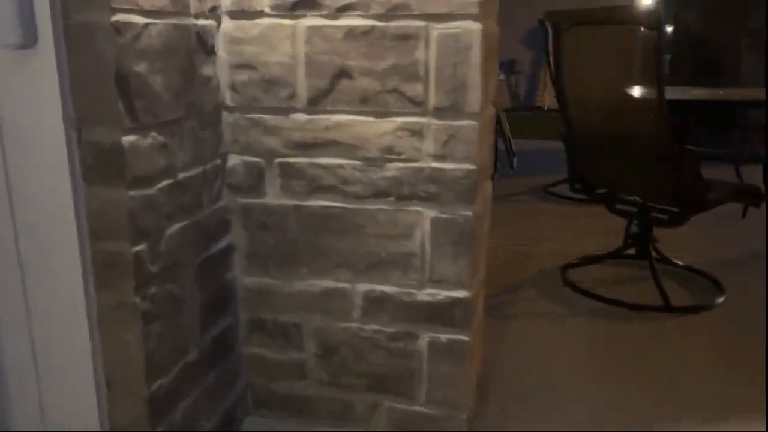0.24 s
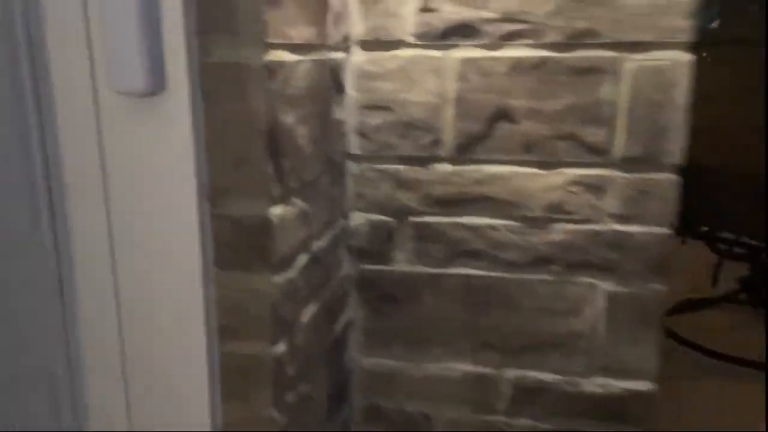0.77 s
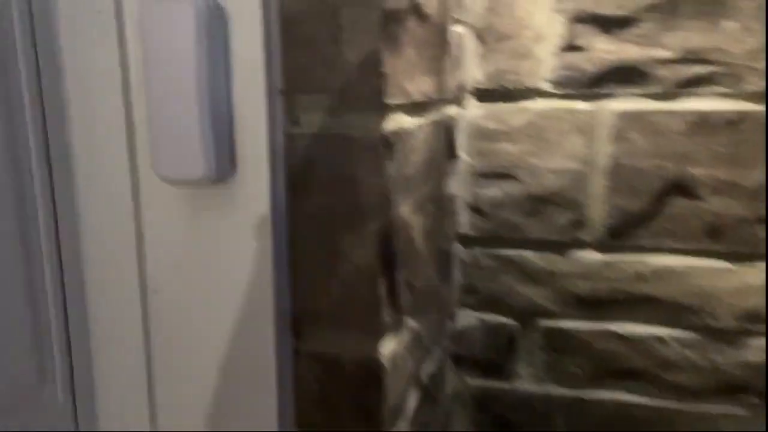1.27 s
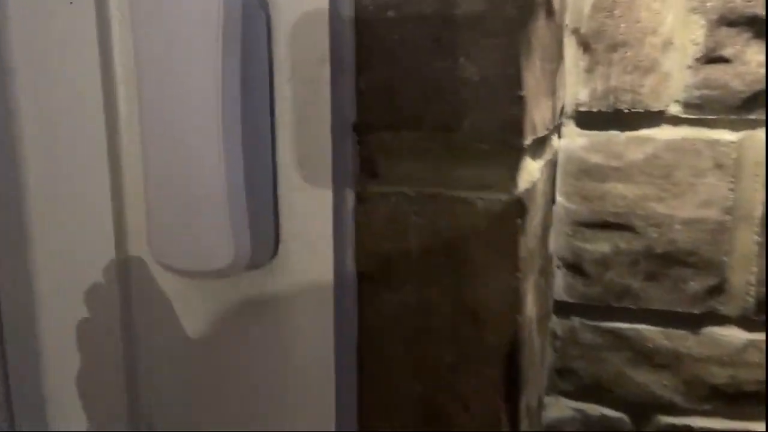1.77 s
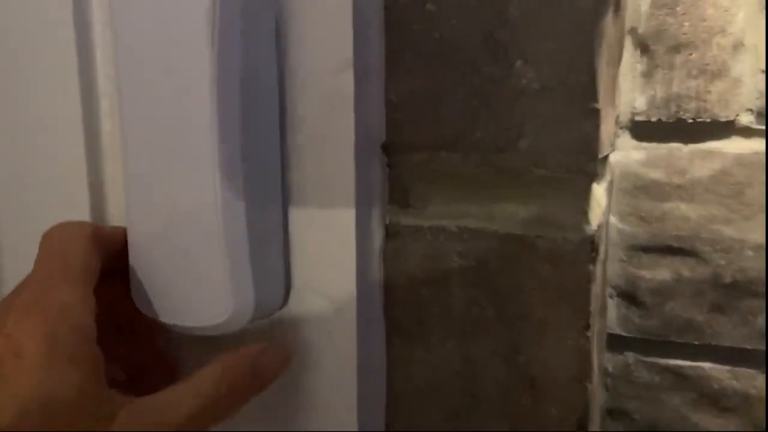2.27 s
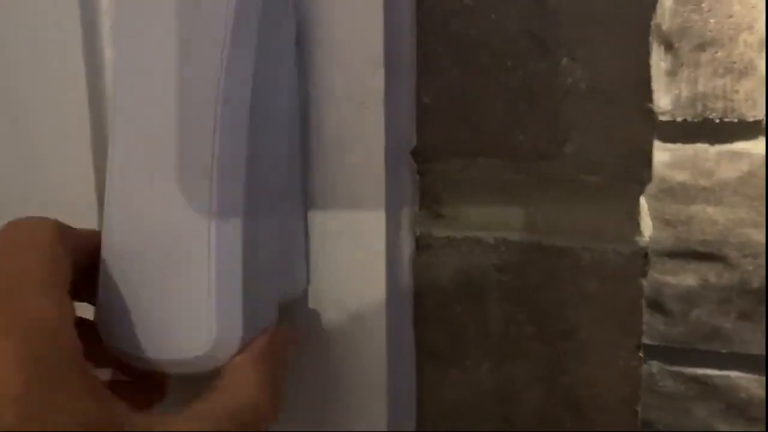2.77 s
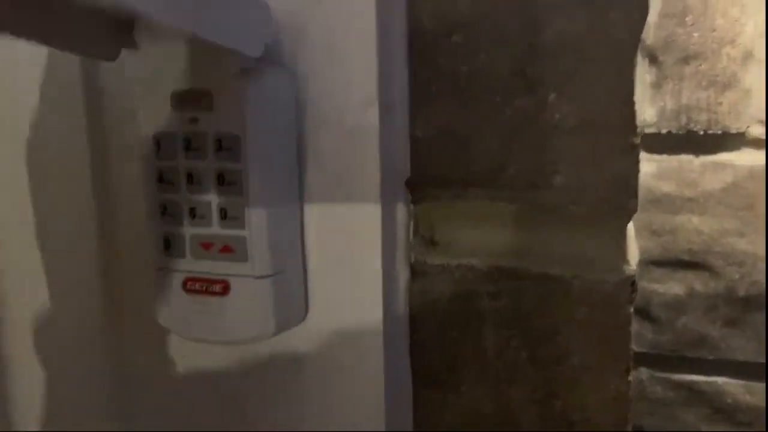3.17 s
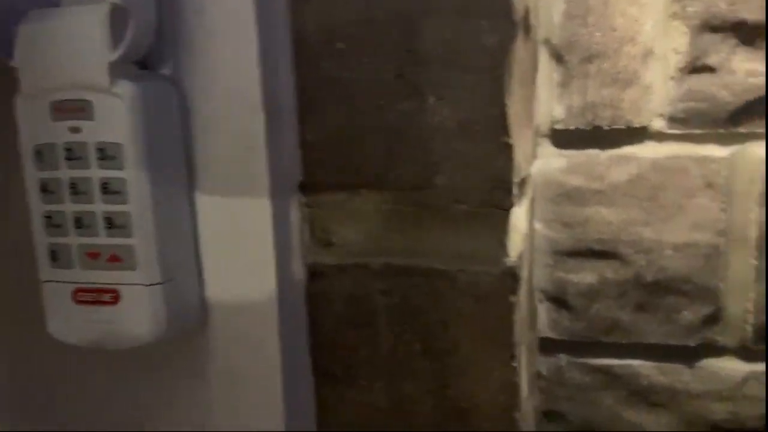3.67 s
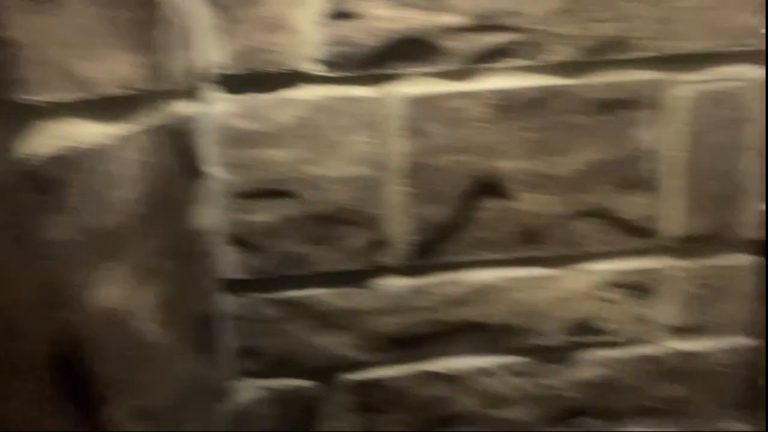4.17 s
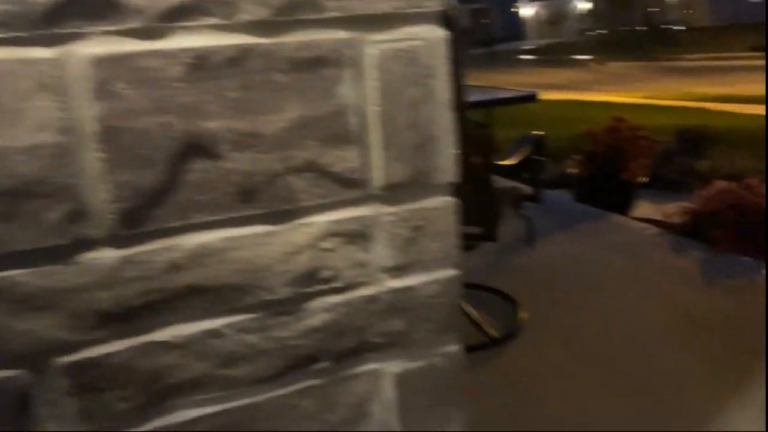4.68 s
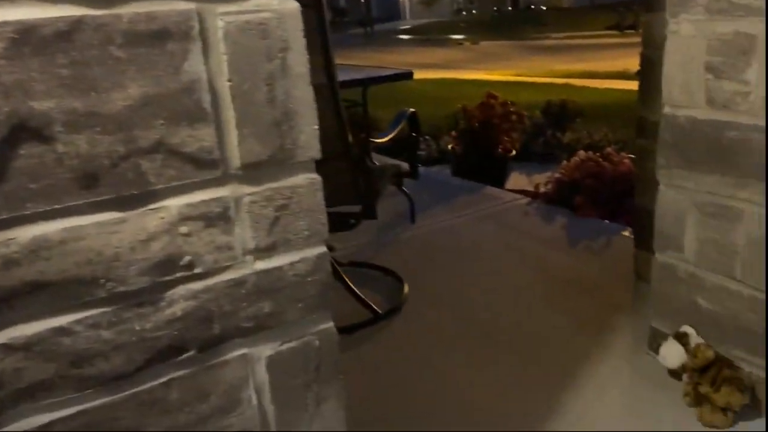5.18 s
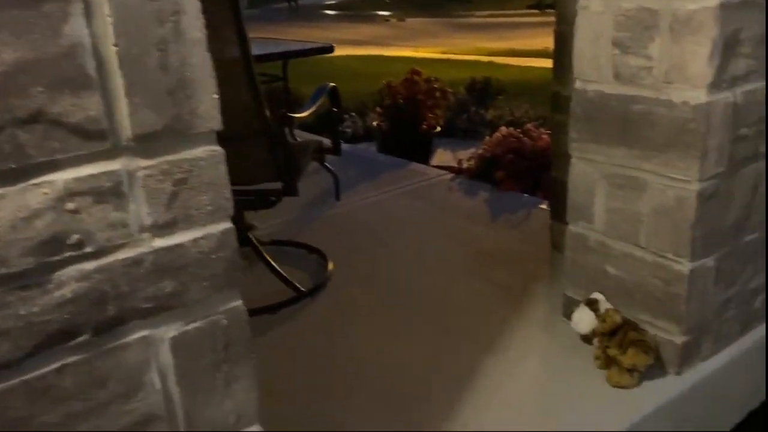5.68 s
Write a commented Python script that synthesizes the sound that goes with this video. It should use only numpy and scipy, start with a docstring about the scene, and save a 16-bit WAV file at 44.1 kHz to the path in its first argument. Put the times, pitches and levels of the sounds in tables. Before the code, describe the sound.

Close handheld stereo microphone on a stone porch at night. Distant traffic washes softly under cricket chirps and a katydid's ticks and buzzes. Heels thud around one second, a low motor hum swells at two, fingers scrape a plastic keypad cover, it clicks at about 2.8 and snaps loudly at 3.6. Afterwards hum and insects continue, with a faint car whirr near the end.

```python
"""A low rumble and the wash of far traffic come first, on a stone porch beside a garage at night.
The garage motor hums and drones through the wall as wandering tones; a far car whirrs past in narrow bands.
A katydid ticks and buzzes in bursts of ringing noise, and a cricket chirps in short falling whistles.
Heels thud with sinking pitch, soles and fingers scrape in gritty bursts, and a hand lifts a keypad's
plastic cover, which hisses on its hinge and snaps against its stop: each blow rings its modes and cracks."""
import sys
import numpy as np
from scipy import signal
from scipy.fft import rfft, irfft, next_fast_len
from scipy.io import wavfile

SR = 44100
rng = np.random.default_rng(int(sys.argv[2]) if len(sys.argv) > 2 else 0)


def int16_out(signal):
    """Quantize to a 16-bit WAV file."""
    q = np.round(np.clip(np.atleast_2d(signal).T, -1, 1) * 32767)
    wavfile.write(sys.argv[1], SR, q.astype(np.int16))


N = 261954   # length in samples


def amp(db):
    """Decibel law: the amplitude gain of a level in dB."""
    return 10 ** (np.asarray(db) / 20)


def rms_one(x):
    """Normalisation by energy: the signal scaled to rms 1."""
    return x / np.sqrt(np.mean(x ** 2) + 1e-20)


def in_time(rows):
    """Linear interpolation: each column of a curve, sample by sample."""
    s, *columns = np.transpose(rows)
    return [np.interp(np.arange(N) / SR, s, column) for column in columns]


def gated(rows):
    """Envelope: the gain of a level curve, silent outside its span."""
    t = np.arange(N) / SR
    return amp(in_time(rows)[0]) * (t > rows[0][0]) * (t < rows[-1][0])


def at_hz(points, hz):
    """Logarithmic frequency scale: a spectrum read between its points."""
    point_hz, value = np.array(points)[:, 0], np.array(points)[:, 1]
    return np.interp(np.log(hz), np.log(point_hz), value)


def drift(rate_hz):
    """Low-pass random process: slow chance of rms 1, made at every 40th sample."""
    r = np.exp(-80 * np.pi * rate_hz / SR)
    chance = rng.standard_normal(N // 40 + 2002)
    slow = signal.lfilter([1], [1, -2 * r, r * r], chance)[2000:]
    return np.interp(np.arange(N) / 40, np.arange(len(slow)), rms_one(slow))


# Usual left-right correlation of noise: pitch_hz, likeness (-1 to 1)
CHANNEL_LIKENESS = [(60, 0.98), (120, 0.89), (240, 0.64), (480, -0.063), (950, -0.34), (1890, 0.13),
                    (3770, 0.73), (7520, -0.6), (15000, 0.48)]
# Usual balance of noise: pitch_hz, left_minus_right_db
CHANNEL_BALANCE = [(60, 0), (150, 5.5), (380, -2), (950, -1.0), (2380, -0.5), (5980, -2), (15000, 2)]


def coloured(spectrum, size, slope_db=0, likeness=None, lean=None):
    """Spectral shaping: stereo noise with a spectrum, tilt in dB per octave, correlation and balance; rms 1."""
    hz = np.maximum(np.arange(size // 2 + 1) * SR / size, 10)
    mid, side = rfft(rng.standard_normal((2, size)))
    alike = np.clip(at_hz(likeness or CHANNEL_LIKENESS, hz), -1, 1)
    sign = np.array([[1], [-1]])
    tilt_db = slope_db * np.log2(hz / 2000)   # pivots at 2 kHz
    balance_db = sign * at_hz(lean or CHANNEL_BALANCE, hz) / 2
    gain = amp(at_hz(spectrum, hz) + tilt_db + balance_db)
    pair = np.sqrt(1 + alike) * mid + sign * np.sqrt(1 - alike) * side
    return rms_one(irfft(gain * pair, size))


def resonance(x, hz, width_hz):
    """Simple resonator: a two-pole peak of gain 1."""
    r = np.exp(-np.pi * width_hz / SR)
    zeros = np.array([1, 0, -1]) * (1 - r * r) / 2
    return signal.lfilter(zeros, [1, -2 * r * np.cos(2 * np.pi * hz / SR), r * r], x)


def wavering(hz, width_hz, core):
    """Line broadening: a tone whose strength and phase wander about a steady core; rms 1."""
    pole = np.exp(-np.pi * width_hz / SR)
    swing = signal.lfilter([1], [1, -pole], rng.standard_normal((2, N)))
    envelope = rms_one(swing[0]) + 1j * rms_one(swing[1]) + core
    carrier = np.exp(2j * np.pi * np.cumsum(hz * np.ones(N)) / SR)
    return rms_one(np.real(envelope * carrier))


def add(out, s, sound):
    """Superposition: mixes a short sound in at a time."""
    i = round(s * SR)
    out[:, i:i + sound.shape[-1]] += sound[..., :N - i]


# Far traffic before its chance swelling: time_s, level_db, brightness_db_per_octave
TRAFFIC_CURVE = [(0, -53.5, 0), (.36, -52, 0), (1.34, -53, 2), (1.85, -56, 2.1), (2.15, -52.5, 2),
                 (2.55, -54.5, 0.8), (3.5, -53.5, 2), (3.8, -56, 1), (4.6, -55.5, 2), (5.71, -53.5, 2),
                 (5.94, -54.5, 1.6)]
# Spectrum of the wash: pitch_hz, relative_level_db
WASH_SPECTRUM = [(88, -27), (150, -3.5), (246, -0.5), (339, -6.5), (1000, -4), (2350, -13.5), (2950, -16),
                 (3930, -23), (6940, -25.5), (8390, -19), (9220, -42), (11100, -33), (14000, -42.5),
                 (14900, -52)]
# Peaks the porch adds: pitch_hz, width_hz, lift_db
PORCH_PEAKS = [(914, 200, 3), (1860, 130, 0.5), (2976, 63, 5.5), (3646, 80, 7.5), (6000, 33, 9.5)]


def traffic():
    """Room colouration: a noise wash with resonant peaks, whose octave bands fluctuate independently."""
    level_db, slope_db = in_time(TRAFFIC_CURVE)
    hz = np.maximum(np.arange(N // 2 + 1) * SR / N, 10)
    porch_db = sum(db / (1 + (2 * (hz - top) / w) ** 2) for top, w, db in PORCH_PEAKS)
    wash = rfft(coloured(WASH_SPECTRUM, N)) * amp(porch_db)
    octave = np.clip(np.log2(hz / 2000), -4, 3)
    out = 0
    for centre in range(-4, 4):
        crossfade = np.clip(1 - abs(octave - centre), 0, 1)
        band = irfft(wash * crossfade, N)
        out = out + band * amp(slope_db * centre + 2.2 * drift(24.0))
    return amp(level_db) * out


BAND_HZ, BAND_WIDTH_HZ, BAND_DB = 1900, 660, -63
BAND_FADES_S, BAND_FADE_LENGTH_S = 1.62, 0.88


def fading_band():
    """Band-pass noise: a breathy band holds with a flickering level, then fades linearly."""
    remaining = np.clip(1 - (np.arange(N) / SR - BAND_FADES_S) / BAND_FADE_LENGTH_S, 0, 1)
    breath = coloured(WASH_SPECTRUM, N)
    for _ in range(2):
        breath = resonance(breath, BAND_HZ, BAND_WIDTH_HZ)
    return amp(BAND_DB + 2.1 * drift(13.0)) * remaining * rms_one(breath)


CAR_S, CAR_SWELL_S, CAR_DB = 5.69, 0.5, -65   # loudest moment, breadth, reference level of the strands
STRAND_FLICKER_DB, STRAND_GLIDE, STRAND_DRIFT_HZ = 3, .045, 5   # glide is a share of the pitch
# Strands of the car's whirr: pitch_hz, width_hz, relative_level_db
CAR_WHIRR = [(772, 11, 1), (1000, 51, -5), (1363, 51, -1), (1714, 46, -5)]


def far_car():
    """Narrow-band noise: a few strands wander in pitch and level under one Gaussian swell."""
    swell = np.exp(-((np.arange(N) / SR - CAR_S) / CAR_SWELL_S) ** 2)
    whirr = 0
    for hz, width_hz, db in CAR_WHIRR:
        gain = amp(db + STRAND_FLICKER_DB * drift(STRAND_DRIFT_HZ))
        pitch_hz = hz * (1 + STRAND_GLIDE * drift(STRAND_DRIFT_HZ))
        whirr = whirr + gain * wavering(pitch_hz, width_hz, core=0.31)
    return amp(CAR_DB) * swell * whirr


HUM_HZ, HUM_WIDTH_HZ, HUM_CORE = 71, 3.0, 2.5   # core: steady share beside the wandering part
DRONE_HZ, DRONE_LATER_HZ, DRONE_WIDTH_HZ = 206.5, 227.4, 22
DRONE_STEPS_S, DRONE_STEP_LENGTH_S = 3.55, 0.1297   # the drone glides up once
WHINE_HZ, WHINE_DB = 262, -63
WHINE_FROM_S, WHINE_LENGTH_S, WHINE_EDGE_S = 3.72, 0.8, 0.048
# Motor through the wall, and a low rumble that swells with footfalls near 0.22 s and 1.12 s, before balance and
# chance: time_s, rumble_db, hum_db, drone_db
LOW_SOUND_CURVE = [(0, -53.5, -71, -79), (.22, -48.5, -74, -61.5), (.4, -53, -64.5, -81),
                   (.95, -55.5, -70, -77), (1.12, -48, -77, -73), (1.35, -56.5, -64, -71),
                   (1.7, -59, -59, -66.5), (2.05, -47.5, -41, -58.5), (2.3, -45, -46.5, -68),
                   (2.45, -48.5, -46.5, -62.5), (2.85, -50.5, -47.5, -57.5), (3.12, -43, -55.5, -58.5),
                   (3.45, -53, -54, -61.5), (3.68, -56, -54, -56), (3.8, -47, -52, -56),
                   (4.45, -48, -54, -59.5), (4.65, -47, -46, -65.5), (5.68, -45.5, -55, -65),
                   (5.94, -48.5, -66, -67)]
# Spectrum of the rumble: pitch_hz, relative_level_db
RUMBLE_SPECTRUM = [(12, -41.5), (20, -58), (41, -0.5), (64, 6), (111, -2), (193, -16), (228, -28),
                   (400, -20.5), (520, -59), (880, -120)]


def motor_and_footfall_rumble():
    """Forced vibration: a wavering hum, a lumpy rumble that swells with footfalls, and the drone and whine of
    door panels."""
    t = np.arange(N) / SR
    rumble_db, hum_db, drone_db = in_time(LOW_SOUND_CURVE)
    step = np.clip((t - DRONE_STEPS_S) / DRONE_STEP_LENGTH_S, 0, 1)
    drone_hz = DRONE_HZ + (DRONE_LATER_HZ - DRONE_HZ) * step
    to_edge_s = np.minimum(t - WHINE_FROM_S, WHINE_FROM_S + WHINE_LENGTH_S - t)
    whining = np.clip(to_edge_s / WHINE_EDGE_S, 0, 1)
    tones = amp(hum_db) * wavering(HUM_HZ, HUM_WIDTH_HZ, HUM_CORE)
    tones += amp(drone_db) * wavering(drone_hz, DRONE_WIDTH_HZ, core=0.21)
    tones += amp(WHINE_DB) * whining * wavering(WHINE_HZ, 2.6, HUM_CORE * 2)
    rumble = amp(rumble_db + 1.3 * drift(2.0)) * coloured(RUMBLE_SPECTRUM, N)
    return rumble + tones * amp([[1.1], [-1.1]])


CHIRP_HZ, CHIRP_FALL_HZ, CHIRP_S = 7280, 300, .024
CRICKET_LEAD_RAD = 1.05   # mean phase by which the left leads
CHORUS_HZ, CHORUS_WIDTH_HZ, CHORUS_DB = 6720, 920, -76   # far crickets blur into a band
# Cricket bouts, before chance: first_chirp_s, last_chirp_limit_s, period_s, peak_db
CRICKET_BOUTS = [(.72, 1.7, .0712, -71), (1.779, 2.26, .069, -67), (2.33, 2.7, .0705, -66),
                 (2.813, 4.12, .0712, -65.5), (4.16, 4.85, .072, -66.5), (4.92, 5.93, .071, -70)]


def cricket():
    """Frequency modulation: each chirp is a slightly rough whistle falling in pitch; far ones blur together."""
    out, t = np.zeros((2, N)), np.arange(round(CHIRP_S * SR)) / SR
    phase = 2 * np.pi * (CHIRP_HZ * t - CHIRP_FALL_HZ * t ** 3 / (3 * CHIRP_S ** 2))
    lead = CRICKET_LEAD_RAD * np.array([[1], [0]])
    shape = np.sin(np.pi * t / CHIRP_S) ** 0.11
    chance = rng.standard_normal((len(CRICKET_BOUTS), 30, 3))
    for (first, last, period, db), rows in zip(CRICKET_BOUTS, chance):
        for s, (late, spread, turn) in zip(np.arange(first, last, period), rows):
            whistle = np.sin(phase + (1 + 0.25 * turn) * lead)
            add(out, s + 0.0035 * late, amp(db + 1.07 * spread) * shape * whistle)
    far = rng.standard_normal(N)
    for _ in range(2):
        far = resonance(far, CHORUS_HZ, CHORUS_WIDTH_HZ)
    analytic = signal.hilbert(rms_one(far), next_fast_len(N))[:N]
    far = np.real(analytic * np.exp(1j * lead))
    return out * (1 + .5 * drift(200.)) + amp(CHORUS_DB) * far


TICK_PERIOD_S, TICK_SPREAD_DB = .0876, .9   # nominal period, random spread
# Tick phrases: first_s, last_s, lateness_of_middle_s, then rms over 23 ms, before spread and balance:
# first_level_db, middle_level_db, last_level_db
TICK_PHRASES = [(0.59, 1.902, 0.0022, -62.5, -57, -52.5), (2.401, 3.369, 0.00022, -63, -70, -60),
                (3.81, 4.768, 0.00049, -74, -59, -57.5), (5.2675, 5.883, 0.00009, -59.5, -59, -59.5)]


def ticks():
    """Pulse train: time and level of near-even ticks, the level following a parabola through three marks."""
    for first, last, late, *marks_db in TICK_PHRASES:
        along = np.linspace(0, 1, round((last - first) / TICK_PERIOD_S) + 1)
        times = first + (last - first) * along + late * np.sin(np.pi * along)
        level_db = np.polyval(np.polyfit([0, .5, 1], marks_db, 2), along)
        yield from zip(times, level_db + TICK_SPREAD_DB * rng.standard_normal(len(along)))


STROKE_PAIRS_PER_S, BUZZ_RELEASE_DB_PER_S = 58.8, 300
LOWER_RING_HZ, TICK_RING_S, TICK_RING_DB = 4390, .0038, -1.5   # decay time; ring gain before its envelope
# Buzzes that close a phrase: start_s, length_s, start_level_db, fading_db_per_s
KATYDID_BUZZES = [(1.982, 0.345, -54, 31), (4.856, 0.33, -55.5, -3.5)]
# Wing spectrum: pitch_hz, relative_level_db
WING_SPECTRUM = [(2060, -9), (4500, -11), (8150, 1), (8690, 2.5), (9260, -43), (9740, -5.5), (10900, -4.5),
                 (13600, -15.5), (16000, -49)]
# Left-right correlation of the ticks' rasp: pitch_hz, likeness (-1 to 1)
TICK_LIKENESS = [(4000, -0.35), (6000, 0.25), (7500, -0.15), (8300, -0.42), (11000, 0.12)]
# Katydid's balance and ring: time_s, left_minus_right_db, upper_ring_hz, lower_ring_relative_db
KATYDID_CURVE = [(0.5, 0, 6800, -20), (1.6, 1.5, 8200, -37), (2.801, -1, 7400, -22), (3.3, -2, 6560, -22),
                 (4.42, -1, 6870, -28), (4.6, -2.5, 5800, -28), (5.4, 2, 5700, -2), (5.9, 0, 6100, -1)]


def katydid():
    """Stridulation: single wing strokes tick and ring; run together, hard and soft in turn, they buzz."""
    out, t = np.zeros((2, N)), np.arange(1024) / SR
    shape = (1 - np.exp(-t / .0004)) * (np.exp(-t / .0013) + .2 * np.exp(-t / .006))
    ring_shape = (1 - np.exp(-t / 0.0036)) * np.exp(-t / TICK_RING_S)
    when, _, upper_ring_hz, lower_ring_db = np.transpose(KATYDID_CURVE)
    for s, db in ticks():
        hz = np.interp(s, when, upper_ring_hz) * rng.normal(1, .008)
        rasp = shape * coloured(WING_SPECTRUM, size=1024, likeness=TICK_LIKENESS)
        grain = rng.standard_normal(len(t))
        upper, lower = [0.6 * rms_one(resonance(grain, top, 400)) + np.sin(2 * np.pi * top * t)
                        for top in (hz, LOWER_RING_HZ)]
        rings = upper + amp(np.interp(s, when, lower_ring_db)) * lower
        tick = rasp + amp(TICK_RING_DB) * rings * ring_shape
        add(out, s, amp(db) * rms_one(tick))
    rasp = coloured(WING_SPECTRUM, N)
    for s, length, db, fading in KATYDID_BUZZES:
        since = np.arange(N) / SR - s
        phase = since * STROKE_PAIRS_PER_S % 1
        release_db = BUZZ_RELEASE_DB_PER_S * np.maximum(since - length, 0)
        level_db = db - fading * since - release_db + 1.3 * drift(39.0)
        strokes = 0.67 + 1.4 * np.exp(-phase / 0.13) + 1.5 * np.exp(-((phase + .5) % 1) / 0.22)
        out += (since > 0) * amp(level_db) * rms_one(strokes) * rasp
    return out * amp(np.outer([.5, -.5], in_time(KATYDID_CURVE)[0]))


# Dull thuds of heels and of the cover on its stop: start_s, level_db (before the soft attack),
# nominal_pitch_hz (scaled by the sinking curve), t60_s
THUD_EVENTS = [(0.075, -40, 156, 0.1), (0.16, -34, 169, 0.18), (1.049, -36, 152, 0.19),
               (1.072, -31.5, 260, 0.07), (1.092, -28.5, 211, 0.11), (1.1, -19.5, 92, 0.069),
               (1.595, -31, 335, 0.023), (1.628, -23, 297, 0.022), (3.56, -7, 261, 0.032)]


def thuds():
    """Damped oscillation: each impact swells softly and dies exponentially while its pitch sinks."""
    out, t = np.zeros((2, N)), np.arange(8192) / SR
    for s, db, hz, t60 in THUD_EVENTS:
        pitch_hz = hz * (0.424 + 0.97 * np.exp(-t / 0.011))
        envelope = amp(db - 60 * t / t60) * (1 - np.exp(-t / 0.0069))
        tone = np.sin(2 * np.pi * np.cumsum(pitch_hz) / SR)
        add(out, s, envelope * tone * amp([[1.5], [-1.5]]))
    return out


SCUFF_ATTACK_S, SCUFF_RELEASE_S = .0045, .007
SINK_S, CLEAR_HZ = .025, 1100   # time to sink the listed interval; squeaks well above this pitch are rough
# Sole scuffs and finger rubs: start_s, level_db, length_s, brightness_db_per_octave, squeak_hz,
# squeak_relative_db, cover_ring_relative_db, squeak_sinks_octaves
SCUFF_EVENTS = [(0.43, -45, 0.015, 1.5, 570, -8.5, -13, 0.13),
                (1.383, -51.5, 0.018, -2.5, 537, -22, -26, 0.12),
                (1.591, -57, 0.031, 2, 409, -10.5, -12, 0.21), (1.945, -49.5, 0.02, 5, 960, 10, -12, 0.025),
                (1.939, -55.5, 0.019, 3, 517.5, 9.5, -16, 0.197),
                (3.464, -45, 0.021, -5, 1495, 9, -10, 0.94),
                (3.462, -54.5, 0.016, -1.5, 3980, 8.5, -30, 0.1),
                (3.485, -47, 0.0082, -4, 1140, -5, -2, 0.026),
                (3.506, -45.5, 0.009, -6, 1147, 7, -10, 0.16),
                (3.507, -50, 0.015, -9.5, 1820, 10.5, -23, 0.058),
                (3.511, -54.5, 0.013, -4.5, 493, 4, 1, 0.31), (3.547, -40, 0.005, -2, 6960, 13, -22, 0.068),
                (3.77, -53, 0.017, -2, 507, -14, -16, 0.18), (5.752, -59, 0.024, -4.5, 1006, 2, -20, 0.017)]
# Spectrum of the grit: pitch_hz, relative_level_db
GRIT_SPECTRUM = [(120, 0), (200, 6.5), (722, -5.5), (1020, -9.5), (1840, 4.5), (2650, -2.5), (6400, -3.5),
                 (8420, -7.5), (9230, -48), (10500, -11), (13100, -19), (14600, -26), (16000, -77)]


def scuffs():
    """Stick-slip friction: gritty bursts squeak with sinking pitch, and sparse slips stir the cover's modes."""
    out, t = np.zeros((2, N)), np.arange(8192) / SR
    for s, db, length, slope_db, squeak_hz, squeak_db, ring_db, sinks in SCUFF_EVENTS:
        attack = np.clip(t / SCUFF_ATTACK_S, 0, 1)
        shape = attack * np.exp(-np.maximum(t - length, 0) / SCUFF_RELEASE_S)
        grit = coloured(GRIT_SPECTRUM, len(t), slope_db, [(100, 0.86), (9000, 0.28)])
        squeak = rms_one(resonance(grit, squeak_hz, 0.15 * squeak_hz))
        squeak = squeak + 0.14 * rms_one(resonance(grit, 3 * squeak_hz, 750))
        pure = np.sin(2 * np.pi * (squeak_hz * t + rng.random()))
        squeak = squeak + (CLEAR_HZ / squeak_hz) ** 2 * pure
        # reading ever more slowly through the squeak sinks its pitch
        slowed = np.cumsum(2 ** (-sinks * np.minimum(t / SINK_S, 1.2) ** 2)) / SR
        squeak = np.array([np.interp(slowed, t, side) for side in squeak])
        slips = shape * rng.standard_normal(len(t)) * (rng.random(len(t)) < 1200 / SR)   # 1200 per s
        ring = cover_ring(s, t[:4096], low_db=-0.53, high_db=-2.8, slope_db=-13.0, damping=0.81)
        stirred = signal.fftconvolve(slips[None], ring, axes=1)[:, :len(t)]
        scrape = shape * (grit + amp(squeak_db) * squeak)
        add(out, s, amp(db) * (scrape + amp(ring_db) * stirred))
    return out


OPENS_S = 2.8   # sounds from here on ring the open cover's modes
SWELL_CYCLES = .35   # cycles a mode takes to swell, beside a fixed 0.34 ms
TWIN_SPREAD = .05   # every high mode has a twin close by, at another pitch each blow
ROUGH_DB, ROUGH_PER_S = 3.0, 380   # the loose cover shakes each mode, less below 1 kHz
# Modes of the cover shut on the keypad: pitch_hz, relative_level_db, t60_s (at damping factor 1)
SHUT_MODES = [(242, -5, 0.039), (369, 0, 0.034), (444, -0.5, 0.052), (624, -18, 0.03), (776, 10, 0.02),
              (936, -6, 0.05), (1160, -4.5, 0.046), (1515, -19, 0.16), (1865, -3.5, 0.039),
              (1940, -7, 0.033), (3385, -7, 0.042), (3440, -18, 0.019), (7050, -10, 0.014),
              (8200, -14, 0.01), (4840, -16, 0.027), (13100, -18.5, 0.017)]
# Modes of the cover swung open: pitch_hz, relative_level_db, t60_s (at damping factor 1)
OPEN_MODES = [(90.6, -22, 0.2), (170, -8, 0.036), (276, -5, 0.046), (370, -3.5, 0.037), (434, 0, 0.051),
              (490.4, -0.5, 0.046), (748, 0, 0.041), (938, -21, 0.14), (1188, -9, 0.044),
              (1416, -11, 0.072), (1610, -9, 0.047), (1820, -13, 0.071), (2150, -20, 0.045),
              (2487, -16, 0.084), (3137, -17.5, 0.022), (3750, -15, 0.05), (3860, -14.5, 0.026),
              (4460, -13.5, 0.042), (5540, -19, 0.016), (7200, -9, 0.021), (8170, -24, 0.016),
              (10760, -38, 0.014), ]
# Balance of the cover: pitch_hz, left_minus_right_db
COVER_BALANCE = [(60, 1.5), (130, 12), (290, 9.5), (640, 1), (1410, -1), (3100, -2.5), (6820, -0.5),
                 (15000, 2)]
# Phase of the cover's modes: pitch_hz, left_lead_rad
COVER_LEAD = [(0, -0.4), (950, 1.47), (1210, 1.73), (1810, 1.2), (2070, 0.9), (3450, 1), (5170, 0),
              (5860, -13), (7300, 1.5), (9650, -3), (13400, 8)]


def cover_ring(s, t, low_db, high_db, slope_db, damping, favoured_hz=950, lift_db=0):
    """Modal synthesis: decaying modes, lifted near a favoured pitch; low ones swell more slowly."""
    hz, db, t60 = np.transpose(SHUT_MODES if s < OPENS_S else OPEN_MODES)
    high = hz > 1000
    twins_hz = hz[high] * (1 + TWIN_SPREAD * rng.standard_normal(high.sum()))
    hz, db, t60 = np.append(hz, twins_hz), np.append(db, db[high]), np.append(t60, t60[high])
    group_db = np.where(hz < 850, low_db, high_db + slope_db * np.log2(hz / 2000))
    level_db = db + group_db + rng.normal(0, 1.5, len(hz))
    level_db = level_db + lift_db * np.exp(-(np.log2(hz / favoured_hz) / 0.098) ** 2)
    hz, t60, level_db = hz[:, None], t60[:, None], level_db[:, None]   # axes: side, mode, time
    side = np.array([.5, -.5])[:, None, None]
    lead = side * np.interp(hz, *np.transpose(COVER_LEAD))
    # a random starting phase, common to both sides, grows with pitch
    start_phase = rng.uniform(0, 1.5, hz.shape) * np.maximum(np.log2(hz / 450), 0)
    gain = amp(level_db - 60 * damping * t / t60 + side * at_hz(COVER_BALANCE, hz))
    marks = np.arange(len(t) * 400 // SR + 2) / ROUGH_PER_S
    shake_db = ROUGH_DB * rng.standard_normal((len(hz), len(marks)))
    shake_db = shake_db * (marks > 0) * np.minimum(hz / 1000, 1)
    gain = gain * amp([np.interp(t, marks, row) for row in shake_db])
    swell = 1 - np.exp(-t / (0.00034 + SWELL_CYCLES / hz))
    modes = swell * gain * np.sin(2 * np.pi * hz * t + lead + start_phase)
    return np.sum(1.21 * modes, axis=1)


# Cover turning on its hinge, before flutter: time_s, level_db
HINGE_CURVE = [(2.98, -78), (3.1, -61), (3.2, -57.5), (3.33, -57), (3.4, -63.5), (3.44, -53.5),
               (3.475, -47), (3.5, -72)]
# Spectrum of the hinge's rub: pitch_hz, relative_level_db
RUB_SPECTRUM = [(410, -50), (700, -12), (1300, -5), (7290, -13.5), (8420, -11), (9230, -58), (9990, -15),
                (13000, -16), (16000, -34)]


def hinge():
    """Sliding friction: a fluttering noise hiss follows the turning hinge."""
    flutter = amp(drift(25.))
    return gated(HINGE_CURVE) * flutter * coloured(RUB_SPECTRUM, N)


# Cover blows: start_s, level_db (scales ring and crack), low_modes_db, high_modes_db, crack_db,
# brightness_db_per_octave, damping_factor, favoured_hz, favoured_lift_db
BLOW_EVENTS = [(1.9658, -35.5, -6, -4, -1, -5, 0.64, 353, 17.5),
               (2.616, -51, -5, -5, -2, 2.5, 0.48, 456, 8),
               (2.7522, -16.5, -14.5, -7, -6.5, 6, 1.1, 860, 2),
               (2.761, -32, -15, -11, 0, -7.5, 1.1, 1160, 8),
               (2.7687, -33.5, -5, -12, -6, -2, 0.62, 392, 9),
               (2.939, -39.5, -7, -17, 2.5, -13, 0.5, 1115, 22),
               (3.269, -58, -10.5, -2, 8, -18, 0.54, 419, 20),
               (3.558, -3, -5, -7.5, -5.5, 3.5, 1.29, 485, -1.5),
               (3.5626, -13.5, -6.5, -1, -12.5, -3, 1.27, 486, 5),
               (3.59, -23, -12, -8, 1, -3.5, 0.77, 4200, 13),
               (3.6298, -11, -5.5, -8.5, -3, 2, 1.39, 3220, 18),
               (3.6385, -31, 0, -15, -21, -6, 0.9, 510, 8), (3.809, -45, -10.5, -13, -23, 2, 0.51, 474, 9)]
# Spectrum of the crack: pitch_hz, relative_level_db
CRACK_SPECTRUM = [(530, -78), (900, -9.5), (2300, -10.5), (5380, -6), (8340, -9.5), (9200, -15.5),
                  (13400, -28.5), (16500, -45)]


def cover():
    """Impact excitation: each blow rings the plastic modes and adds a crack of quickly dying noise."""
    out, t = np.zeros((2, N)), np.arange(8192) / SR
    likeness = [(1000, 0.69), (4000, 0.79), (8000, -0.77), (12000, 0.2)]
    for s, db, low_db, high_db, crack_db, slope_db, damping, *favoured in BLOW_EVENTS:
        decay = np.exp(-t / 0.0013) + 0.44 * np.exp(-damping * t / .005) + 0.071 * np.exp(-t / 0.013)
        dying = (1 - np.exp(-t / 0.00022)) * decay
        crack = dying * coloured(CRACK_SPECTRUM, len(t), slope_db, likeness, COVER_BALANCE)
        ring = cover_ring(s, t, low_db, high_db, slope_db, damping, *favoured)
        add(out, s, amp(db) * (ring + amp(crack_db) * crack))
    return out


def scene():
    """Superposition: all sources on the porch, from the background to the cover."""
    background = traffic() + fading_band() + far_car() + motor_and_footfall_rumble()
    insects = cricket() + katydid()
    return background + insects + thuds() + scuffs() + hinge() + cover()


NOTCH_HZ, NOTCH_WIDTH_HZ = 9010, 1920
CUTOFF_HZ = 16600   # stopband edge


def record(dry):
    """Saturation and filtering: peaks are rounded, the treble is notched, the top is cut."""
    dry = np.tanh(dry)
    for _ in range(2):
        dry = dry - 0.52 * resonance(dry, NOTCH_HZ, NOTCH_WIDTH_HZ)
    dry = signal.sosfilt(signal.butter(2, 15500, fs=SR, output="sos"), dry)
    return signal.sosfilt(signal.cheby2(12, 70, CUTOFF_HZ, fs=SR, output="sos"), dry)


dry = scene()
out = record(dry)
int16_out(out)
```